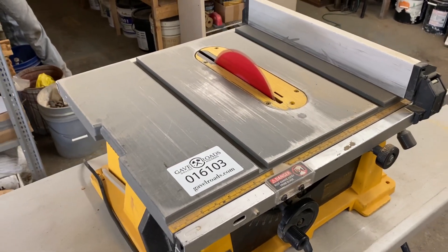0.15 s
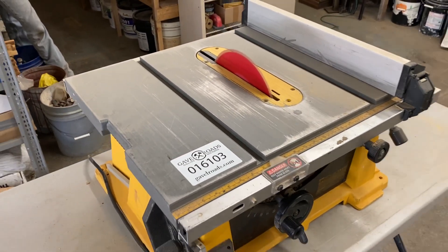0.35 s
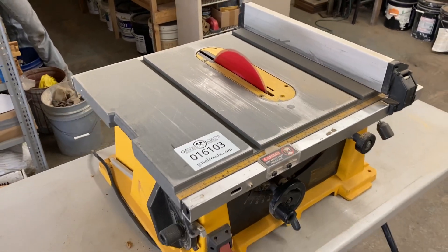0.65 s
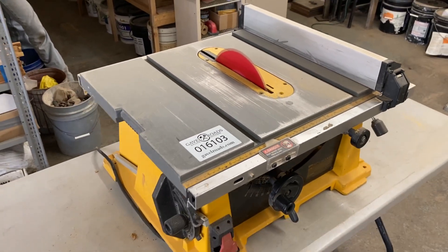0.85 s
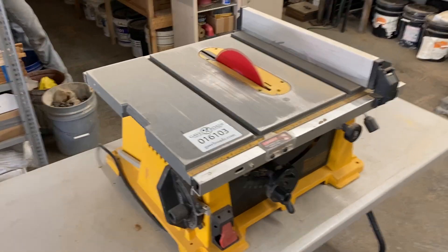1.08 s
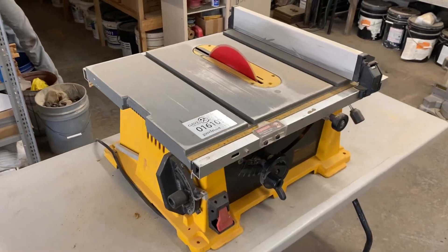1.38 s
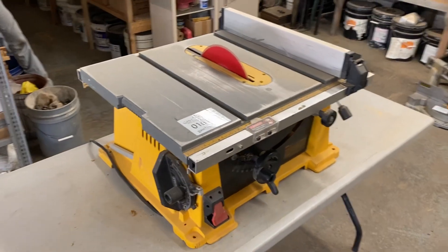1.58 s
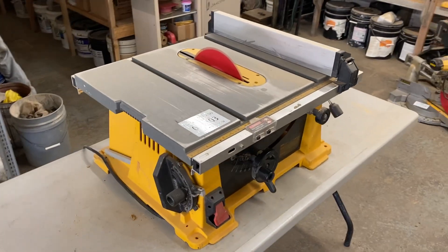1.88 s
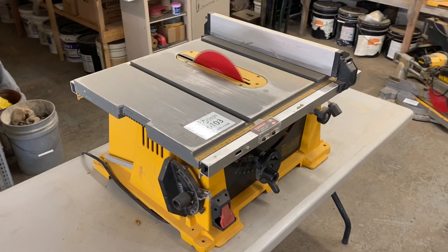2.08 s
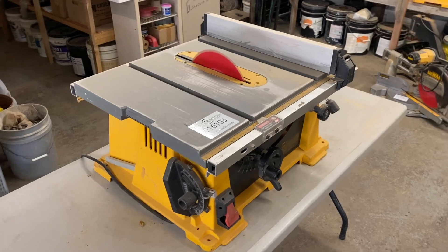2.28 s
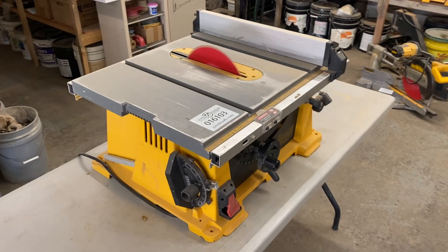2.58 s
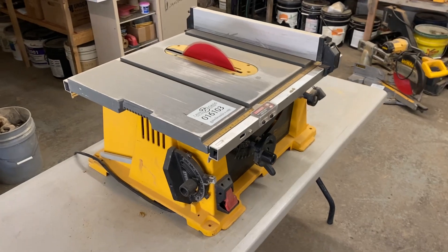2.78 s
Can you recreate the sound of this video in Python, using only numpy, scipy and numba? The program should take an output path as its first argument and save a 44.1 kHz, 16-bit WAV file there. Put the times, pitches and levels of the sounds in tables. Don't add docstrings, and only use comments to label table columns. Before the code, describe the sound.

Close stereo phone pickup of a table saw spinning down in a workshop; its wavering motor and gear whine falls continuously, airy fan rush and metallic chatter fade, over faint low hum and steady hiss.

```python
import sys
import numpy as np
from scipy import signal
from scipy.fft import rfft, irfft
from scipy.io import wavfile
from scipy.ndimage import uniform_filter1d
from numba import njit

SR = 44100
rng = np.random.default_rng(int(sys.argv[2]) if len(sys.argv) > 2 else 0)


def dump(signal):
    limited = np.clip(np.atleast_2d(signal).T, -1, 1)
    pcm = np.round(limited * 32767).astype(np.int16)
    wavfile.write(sys.argv[1], SR, pcm)


def invert_db(level):
    return 10 ** (np.asarray(level, dtype=float) / 20)


N = 129654

# pitch [Hz], width [Hz], gain [dB].
CASE_RINGS = [(1250, 43, 5.5), (1380, 50, 4), (1482, 38, 7), (1619, 55, 10), (1851, 32, 11.5),
              (2025, 49, 2), (2440, 67, 13.5), (2860, 120, -1.5), (3040, 31, 7), (3657, 83, 5),
              (4430, 140, -1), (5823, 105, 7.5), (7630, 1100, -0.5), (8440, 450, 7)]


def set_level(x, db):
    return x * invert_db(db) / np.sqrt(np.mean(x ** 2))


def colour(x, points, scale=1):
    hz, db = np.array(points, float).T
    log_hz = np.log(np.maximum(np.arange(N // 2 + 1) * SR / N, 1))
    gain_db = scale * np.interp(log_hz, np.log(hz), db)
    return irfft(rfft(x) * invert_db(gain_db), N)


@njit
def band(x, hz, width):
    y, band_state, low_state = np.empty(len(x)), 0., 0.
    for i in range(len(x)):
        g, damping = np.tan(np.pi * hz[i] / SR), width[i] / hz[i]
        v = (band_state + g * (x[i] - low_state)) / (1 + g * (g + damping))
        band_state = 2 * v - band_state
        low_state = low_state + 2 * g * v
        y[i] = damping * v
    return y


def steady_band(hz, width):
    return band(rng.standard_normal(N), np.full(N, float(hz)), np.full(N, float(width)))


def ring(x, modes, leak_db=0):
    out = x * invert_db(leak_db)
    for hz, width, db in modes:
        b, a = signal.iirpeak(hz, hz / max(width, 2), fs=SR)
        out = out + invert_db(db) * signal.lfilter(b, a, x)
    return out


def walk(rate):
    hold = int(SR / rate)
    steps = np.repeat(rng.standard_normal(N // hold + 1), hold)
    return 1.35 * uniform_filter1d(uniform_filter1d(steps, hold), hold)[:N]


def wide(points):
    # frequency [Hz], level [dB].
    stray = [(60, -14.5), (380, -15), (700, -13.5), (1300, -5), (3000, -5), (5000, -6), (6500, -11),
             (15000, -23)]
    mid, side = colour(rng.standard_normal((2, N)), points)
    return mid + colour(side, stray) * np.array([[1], [-1]])


def coast():
    # time [s], armature speed [turns per s].
    speed_points = [(0.0, 306.9), (0.29, 283.3), (0.59, 259.8), (0.88, 238.1), (1.18, 216.6), (1.47, 196.7),
                    (1.76, 177.7), (2.06, 158.9), (2.35, 141.6), (2.65, 124.6), (2.94, 109.0)]
    speed = np.interp(np.arange(N) / SR, *np.array(speed_points).T)
    return speed, np.log2(speed[0] / speed)


def throb(speed, depth, twice=0.):
    blade_ratio = .155
    angle = 2 * np.pi * blade_ratio * np.cumsum(speed) / SR
    return 1 + depth * np.sin(angle) + twice * np.cos(2 * angle)


def hiss(slowed):
    # frequency [Hz], strength [dB per Hz].
    hiss_colour = [(25, -18), (45, -3), (700, -11.5), (1240, -7), (6000, -8.5), (9500, -15), (13000, -12.5),
                   (15800, -19)]
    return set_level(wide(hiss_colour), -38) * invert_db(-0.5 * slowed + .6 * walk(12))


def hum(slowed):
    hz, width_hz = 44.5, 5.7
    rough = set_level(steady_band(hz, width_hz), -10)
    pure = np.sin(2 * np.pi * hz * np.arange(N) / SR)
    return set_level(rough + pure, -56) * invert_db(6 * slowed)


def booms(slowed):
    # pitch [Hz], width [Hz], level [dB], change per halving of speed [dB].
    boom_modes = [(95.1, 6.1, -48.5, -40), (219, 9.7, -49.5, -8), (146, 21, -64, -4.5)]
    out = 0
    for hz, width, db, fall_db in boom_modes:
        out = out + set_level(steady_band(hz, width), db) * invert_db(fall_db * slowed)
    return out


def shake(speed):
    # shaft speed [Hz], level [dB].
    stand_response = [(120, -53.5), (140, -51.5), (163, -60), (190, -49.5), (232, -42.5), (243, -47.5),
                      (252, -33), (267, -51.5), (310, -46)]
    hz, db = np.array(stand_response, float).T
    shaft = np.sqrt(2) * np.sin(2 * np.pi * np.cumsum(speed) / SR)
    return shaft * invert_db(np.interp(speed, hz, db) + walk(16.2))


def fan_wind(speed, slowed):
    # frequency [Hz], strength [dB per Hz].
    wind_colour = [(40, -43), (90, -9.5), (690, -6), (960, -6), (1600, -15), (2900, -2), (9000, -20.5),
                   (14000, -76)]
    # pitch [Hz], width [Hz], gain [dB].
    cabinet = [(96.5, 3.8, 5), (223.7, 5.5, 4.5), (440.6, 56, 6.5), (628, 24, 1.5), (798, 25, 5),
               (965.5, 58, 9), (1155, 60, 8), (2860, 220, -6), (3740, 82, 0), (4357, 17, 5)]
    air = set_level(ring(wide(wind_colour), cabinet), -28.5)
    gusts = throb(speed, 0.077)
    return air * gusts * invert_db(-14 * slowed + .6 * walk(5.33))


def gear_rattle(slowed):
    # frequency [Hz], strength [dB per Hz].
    rattle_colour = [(150, -40), (300, 14), (955, -36), (1340, -19), (1880, 6), (4000, -28), (9500, 19.5),
                     (15000, -42)]
    chatter = set_level(ring(wide(rattle_colour), CASE_RINGS), -38)
    return chatter * invert_db(-7 * slowed + .6 * walk(10.7))


def drive_tones(speed, slowed):
    # multiple of shaft speed, level [dB], change per halving of speed [dB],
    # level of the noise skirt against the tone [dB].
    multiples = [(2.985, -46.5, -9, -34), (7.07, -68, 8, 1), (9.03, -60, 3.5, -10), (9.62, -58.5, 4.5, -3),
                 (10.06, -48.5, -3, -3), (10.48, -61.5, 7.5, -9), (11, -60, 4.5, -12), (15.88, -47, -24, 3),
                 (18.93, -59, -1, -1.5), (20.16, -52.5, -5, -5), (25, -72, 7.5, -27),
                 (28.08, -62, -10.5, 8.5), (30.5, -61, -3, -23), (31.96, -65, 10, -18), (31.4, -74, 8, -30),
                 (35.13, -50, -3.5, 5), (45.7, -48.5, -2, -3)]
    # time [s], gear teeth [dB], bearings [dB].
    tone_swells = [(0, -14, -7), (.3, 0, -10), (.6, 3, -6), (.8, 2.5, -6.5), (1.05, 0.5, -0.5),
                   (1.25, -2.5, 0.5), (1.5, 1.5, -1), (1.65, 0, -3), (1.85, 0.5, -0.5), (2.05, 2.5, 1.5),
                   (2.3, 0, 2.5), (2.55, 0, -3), (2.75, -1.5, -4), (2.94, -0.5, 1)]
    first_brush, first_whine = 24, 34
    skirt_turns = 1.2

    turns = np.cumsum(speed) / SR
    s, teeth_db, whine_db = np.array(tone_swells, float).T
    t = np.arange(N) / SR
    wobble_fade = invert_db(-6.5 * slowed)
    wobble = throb(speed, 0.5 * wobble_fade, 0.29 * wobble_fade)
    teeth = invert_db(np.interp(t, s, teeth_db)) * wobble
    whine = invert_db(np.interp(t, s, whine_db))

    out = 0
    for k, db, fall_db, skirt_db in multiples:
        waver = invert_db(1.5 * walk(30))
        tone = np.sqrt(2) * np.sin(2 * np.pi * (k * turns + rng.random())) * waver
        skirt = rng.standard_normal(N)
        for _ in range(2):
            skirt = band(skirt, np.minimum(k * speed, .45 * SR), skirt_turns * speed)
        if k > first_whine:
            bear = whine
        elif k > first_brush:
            bear = 1
        else:
            bear = teeth
        out = out + invert_db(db + fall_db * slowed) * bear * (tone + set_level(skirt, skirt_db))
    out = signal.sosfilt(signal.butter(6, 9530, fs=SR, output="sos"), out)
    return ring(out, CASE_RINGS, -6)


def room(x):
    t60_s, start_s = 0.66, 0.0046
    t = np.arange(int(SR * .8)) / SR
    tail = wide([(100, -6.5), (2000, -0.5), (10000, -6.5)])[:, :len(t)]
    tail = tail * invert_db(-60 * t / t60_s) * (t > start_s)
    tail = tail / np.sqrt(np.mean(np.sum(tail ** 2, axis=1)))
    with_past = np.concatenate([x[len(t):0:-1], x])
    return signal.fftconvolve(with_past[None], tail, axes=1)[:, len(t):len(t) + N]


def ports(x):
    # frequency [Hz], level difference [dB].
    lean = [(60, -0.5), (200, 1.5), (380, -0.8), (700, 2.5), (1290, 7.5), (2380, 1.5), (4400, 4.5),
            (6500, 0.9)]
    # frequency [Hz], lead [half cycles].
    left_lead = [(1200, .25), (2200, 0), (3500, .35), (6600, 0), (10350, -2), (11750, -3), (14000, -4),
                 (15900, -5)]
    sway = .012
    hz, half_cycles = np.array([(0, 0.016)] + left_lead).T
    f = np.arange(N // 2 + 1) * SR / N
    left, right = colour(x[0], lean, scale=0.47), colour(x[1], lean, scale=-0.31)
    leaning = rfft(np.array([left, right]))
    cling = .9 * np.clip((f - 8800) / 1000, 0, 1)
    positions = []
    for s in (sway, -sway):
        lead = np.interp(f, hz, half_cycles) * (1 + s)
        lead = lead - cling * np.sin(2 * np.pi * lead) / (2 * np.pi)
        turn = np.exp(.5j * np.pi * lead * np.array([[1], [-1]]))
        positions.append(irfft(leaning * turn, N))
    share = .5 + .5 * np.tanh(walk(9.8))
    return share * positions[0] + (1 - share) * positions[1]


def scene():
    speed, slowed = coast()
    tones = drive_tones(speed, slowed)
    echo = invert_db(-6.5) * room(tones)
    saw = tones + echo + fan_wind(speed, slowed) + gear_rattle(slowed)
    low = shake(speed) + booms(slowed) + hum(slowed)
    return ports(saw + hiss(slowed)) + low


def top_cut(x):
    return signal.sosfilt(signal.butter(12, 15870, fs=SR, output="sos"), x)


def record(dry):
    bass_cut = signal.butter(6, 37, "high", fs=SR, output="sos")
    return top_cut(signal.sosfilt(bass_cut, dry))


dry = scene()
out = record(dry)
dump(out)
```